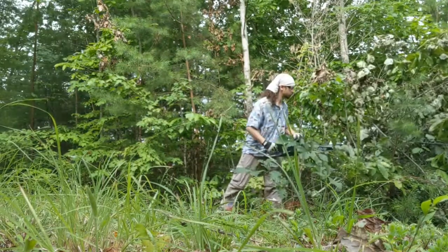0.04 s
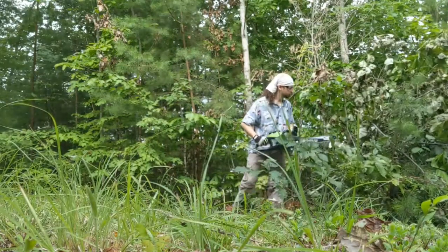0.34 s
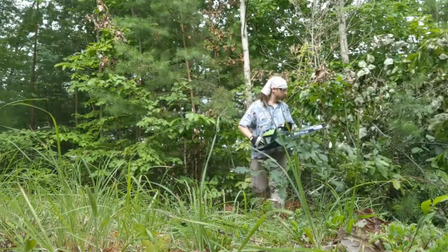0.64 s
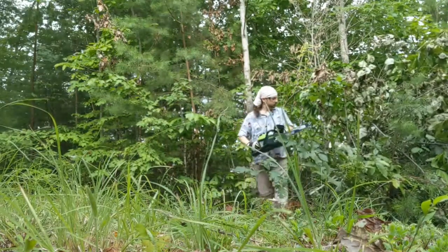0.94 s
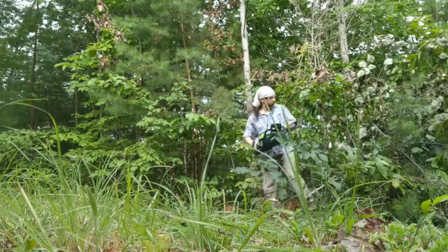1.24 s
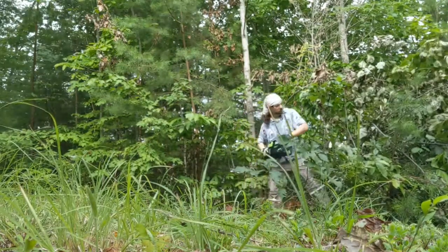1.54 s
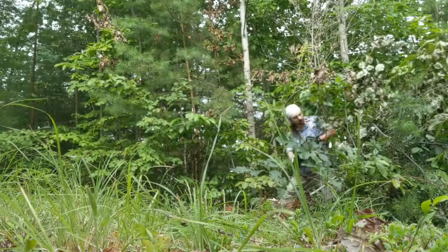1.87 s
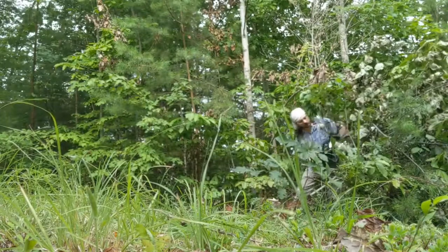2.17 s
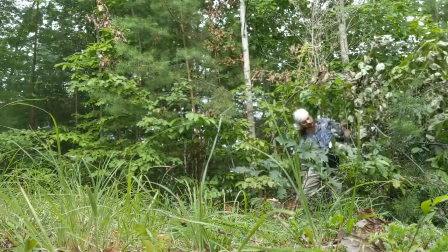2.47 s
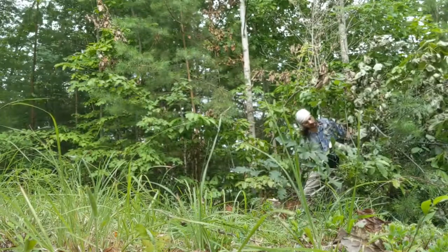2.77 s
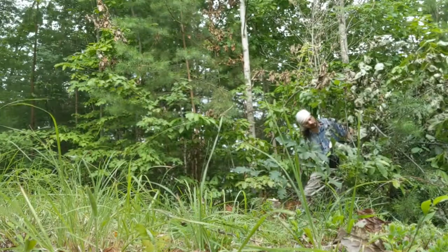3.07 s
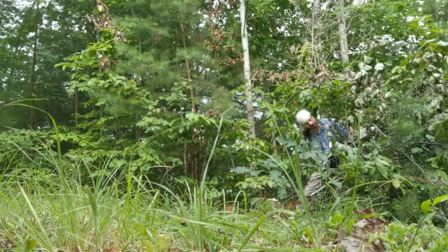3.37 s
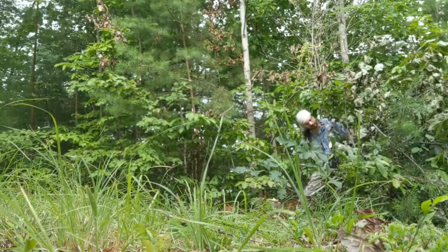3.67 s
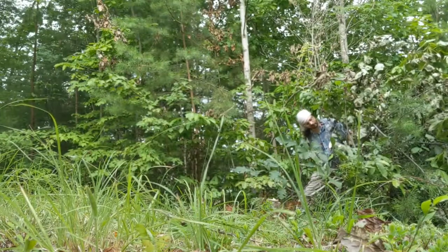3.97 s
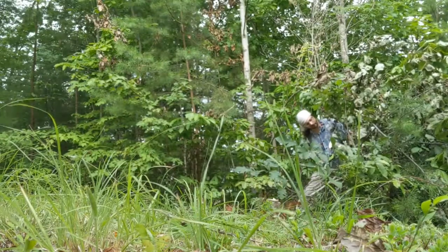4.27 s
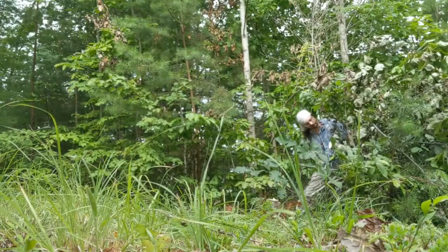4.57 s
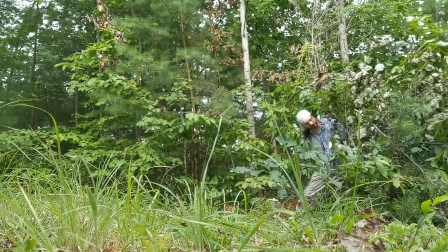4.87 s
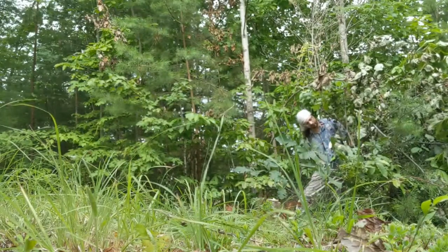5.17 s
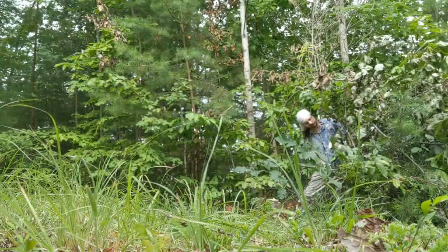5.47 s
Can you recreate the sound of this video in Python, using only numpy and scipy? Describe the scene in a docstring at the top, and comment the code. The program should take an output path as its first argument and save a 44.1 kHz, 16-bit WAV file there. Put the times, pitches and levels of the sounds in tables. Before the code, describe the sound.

A cordless electric chainsaw is already running at full speed, a high, even whine over a fine metallic clatter of the chain. At about 0.6 seconds it starts coasting down, the pitch sinking and the chain rattling more loosely, and by about 1.2 seconds it is braked to a stop. From 1.5 to 2.7 seconds leaves rustle softly as brush is pushed aside, with a few dull bumps on stems. A twig cracks faintly near 2 seconds, two snap sharply around 2.2 and another at 2.6. The saw then spins up in a smooth, slightly raspy rise, reaching speed at about 3.6 seconds. It runs on a little lower than before, wavering and sagging slightly, until the end near 5.7 seconds. Faint forest air lies underneath, the trees scatter back a short tail, and the right side sounds quieter and duller than the left.

```python
"""A cordless chainsaw whines at full speed at the edge of a wood, coasts down and is braked to a stop. Brush
rustles, twigs snap and stems bump; the trigger clicks and the saw spins up again and runs on a little slower.
The whine is the chain meshing with its six-tooth sprocket; the links clatter along the bar and drum the
housing. Trees scatter a short tail over faint forest air. The right microphone is shaded and dull."""
import sys
import numpy as np
from scipy import signal
from scipy.fft import rfft, irfft, next_fast_len
from scipy.io import wavfile
from scipy.ndimage import uniform_filter1d, map_coordinates

SR = 44100
rng = np.random.default_rng(int(sys.argv[2]) if len(sys.argv) > 2 else 0)


def store_pcm(level_fs):
    """Save levels as 16-bit WAV."""
    pcm = np.round(np.clip(level_fs, -1, 1) * 32767).astype(np.int16)
    wavfile.write(sys.argv[1], SR, np.atleast_2d(pcm).T)


N = 252247
TIME_S = np.arange(N) / SR

TEETH = 6
RELEASE_S, BRAKE_S, RESTART_S = 0.55, 1.072, 2.637


# Meshing overtones: (sprocket order [rounded in use], level [dB], growth with speed [dB/octave])
MESH_OVERTONES = [(12, -36.5, 4), (17.97, -43, -0.5), (24.16, -55.5, -2.5)]
# Weaker drive lines: (sprocket order, level [dB], gain on a loose chain [dB])
DRIVE_LINES = [(2, -21, 1), (3, -24, -2.5), (4, -24, -4.5), (5, -27, -6), (7, -31, 6), (8, -24, 7.5),
               (9, -20.5, 1.5), (10, -26.5, 10.5), (11, -30, 10.5), (13, -29.5, 12.5), (17, -23, 6.5)]
# Saw swung about: (time [s], meshing tone gain [dB], left minus right [dB])
SAW_SWING = [(0, 4.5, -4.5), (.17, 2.5, -2.5), (.45, -1.5, -0.5), (.6, -3, -3), (.69, 4.5, .5),
             (.8, 1.5, 1.5), (1.05, 4, -0.5), (3.2, 1.5, 2.5), (3.58, 0, 3.5), (3.68, -8.5, -2),
             (4.0, -10.5, 0), (4.14, -4, 1), (5, -5, 1), (5.45, -8.5, 3), (5.72, -6.5, 4)]
def whine(turns, mesh_hz, drive_db, flutter_db=1.03, slack_rad=0.028, left_lead_rad=0.56):
    """Links mesh with the sprocket: one tone, its overtones and weaker lines, all gliding with speed."""
    swing_db, side_db = curves(SAW_SWING)
    cover_db = 6.5 * np.exp(-((mesh_hz - 871.6) / 47.5) ** 2)  # sprocket cover resonance
    tone_db = -24.5 + speed_db(mesh_hz, db_per_octave=18.5) + cover_db + swing_db
    sag = 1 + np.clip((930 - mesh_hz) / 200, 0, 1.2)  # a slow chain runs less evenly
    angle = 2 * np.pi * turns + slack_rad * sag * wobble(45)
    stereo_rad = np.array([[left_lead_rad], [0]])
    lines = []
    for order, db, growth in MESH_OVERTONES:
        low_cut_db = 20 * np.log10(1 + (450 * TEETH / (order * mesh_hz)) ** 4)  # weak below 450 Hz
        lines.append((round(order), db + speed_db(mesh_hz, growth) - low_cut_db))
    for order, db, loose_db in DRIVE_LINES:
        lines.append((order, drive_db + db + loose_db * looseness()))
    sound = amp(tone_db + flutter_db * sag * wobble(50)) * np.sin(TEETH * angle + stereo_rad)
    for order, db in lines:
        jitter_rad = (0.14 + 0.012 * order) * sag ** 1.8 * wobble(110)
        line_db = db + housing_db(order, mesh_hz) + flare_db(order) - 2.5 + 2 * sag * wobble(40)
        phase = order * angle + jitter_rad + rng.uniform(0, 2 * np.pi)
        sound += amp(line_db) * np.sin(phase + stereo_rad)
    return amp(8 + np.array([side_db, -side_db]) / 2) * sound


# Housing radiation: (frequency [Hz], gain [dB])
HOUSING_RESPONSE = [(100, -37), (300, -14.5), (550, -7), (850, 3.5), (1150, -8.5), (1500, -9),
                    (2200, -12.5), (2700, -7.5), (3000, 12.5), (3400, 9.5), (5000, -30.5)]
def housing_db(order, mesh_hz):
    """Gain of one sprocket order as it glides through the housing's resonances."""
    return along(HOUSING_RESPONSE, order * mesh_hz / TEETH)


# Flares of single lines: (time [s], half length [s], sprocket order, gain [dB])
LINE_FLARES = [(0.02, .06, 12, 15), (.25, 0.31, 8, 5.5), (.28, 0.079, 12, 12), (.41, 0.082, 18, 4.5),
               (0.635, .06, 18, 11), (.85, 0.14, 12, 5.5), (.9, .05, 24, 12.5), (3.176, 0.036, 12, 8),
               (3.72, 0.055, 18, 4.5), (4.17, 0.14, 18, 3.5), (4.2, 0.27, 24, 18.5),
               (4.52, 0.054, 24, 12.5), (5, 0.74, 18, 4.5), (5.1, 0.76, 24, 12.5)]
def flare_db(order):
    """One line swells briefly as the chain tightens."""
    return sum(db * np.exp(-((TIME_S - at_s) / half_s) ** 2)
               for at_s, half_s, flaring, db in LINE_FLARES if flaring == order)


# Held speed, running free: (time [s], link rate [Hz])
FREE_SPEED = [(0.04, 1005), (0.56, 1014)]
# Held speed among the stems: (time [s], link rate [Hz])
WORK_SPEED = [(3.68, 962.9), (3.91, 966), (4.13, 946.2), (4.4, 943.3), (4.47, 931), (4.89, 926.5),
              (5.02, 916), (5.45, 929), (5.6, 918), (5.7, 923)]
def chain_speed(coast_hz_per_s=940, brake_hz_per_s=5400, spin_up_hz_per_s=964,
                torque_fade_s=0.068, creep_hz=95.06, inertia_s=0.06):
    """Link rate in Hz: held, coasting down, braked to rest, then ramped up by the soft start."""
    free_hz, = curves(FREE_SPEED)
    work_hz, = curves(WORK_SPEED)
    released_s = np.clip(TIME_S - RELEASE_S, 0, BRAKE_S - RELEASE_S)
    pulling_s = torque_fade_s * (1 - np.exp(-released_s / torque_fade_s))
    coasting_hz = free_hz - coast_hz_per_s * (released_s - pulling_s)
    braking_hz = coasting_hz - brake_hz_per_s * np.maximum(TIME_S - BRAKE_S, 0)
    stopping_hz = creep_hz * np.logaddexp(0, braking_hz / creep_hz)  # the brake loses grip near rest
    starting_hz = np.minimum(spin_up_hz_per_s * (TIME_S - RESTART_S), work_hz)
    mesh_hz = np.maximum(np.maximum(stopping_hz, starting_hz), 1)
    return uniform_filter1d(mesh_hz, int(inertia_s * SR))


def speed_db(mesh_hz, db_per_octave, full_hz=1000, rest_hz=39.8):
    """Level relative to full speed, falling to silence at rest."""
    return db_per_octave * np.log2(mesh_hz / full_hz) - 20 * np.log10(1 + (rest_hz / mesh_hz) ** 2)


def looseness(onset_s=0.25, free_share=0.37):
    """Chain slack, 0 to 1: slight running free, full once the motor stops pulling, none under load."""
    released = (1 + np.tanh((TIME_S - RELEASE_S) / onset_s)) / 2
    return (TIME_S < RESTART_S) * (free_share + (1 - free_share) * released)


# Broad resonances of links and bar: (frequency [Hz], width [Hz], gain [dB])
STEEL_MODES = [(3220, 1570, -2.5), (4000, 2600, -6.5), (5750, 910, 2.5), (7660, 2180, 3), (9700, 1780, 3),
               (11790, 1650, 1), (13600, 5800, -1)]
# Thin ringing of the steel links: (frequency [Hz], width [Hz], gain [dB])
LINK_RING_MODES = [(6085, 28, 11), (6580, 35, 2)]
def clatter(turns, drive_db, throb_db=-0.5, shake_db=0.5, low_cut_hz=2700):
    """Links tick against the bar, a little harder once a turn; being small, they radiate no bass."""
    force = amp(throb_db * np.sin(2 * np.pi * turns) + shake_db * wobble(90))
    blows = force * ticks(32000, spread_db=1)
    steel = lambda hz: resonances(STEEL_MODES + LINK_RING_MODES, hz) * (1 - 1 / (1 + (hz / low_cut_hz) ** 6))
    return amp(drive_db + 6.5) * unit(filtered(blows, steel))


def guide_bar(mesh_hz, centre_hz=3060, width_hz=430, surge_db=1.5, loose_db=8):
    """The flapping chain makes the bar sing in a hoarse band, loudest while it runs loose."""
    level_db = -31.5 + speed_db(mesh_hz, db_per_octave=5.5) + loose_db * looseness()
    band = resonant_noise([(centre_hz, width_hz, 0)], (2, N))
    return amp(level_db + surge_db * wobble(50)) * band


# Chain knock through the housing: (frequency [Hz], relative density [dB])
KNOCK_SPECTRUM = [(20, -52), (105, -26), (170, -31), (270, -16.5), (390, -20.5), (520, -12.5), (700, -12.5),
                  (850, 3), (1020, -7.5), (1350, -12), (1750, -19), (2400, -15), (5000, -26)]
def knocking(drive_db, growth=0.74, lumpy_db=2, loose_db=-3):
    """The chain slaps in its groove and drums the housing, even at low speed."""
    moving = 1 / (1 + amp(-70.5 - drive_db) ** 2)
    level_db = growth * drive_db - 13.5 + loose_db * looseness() + lumpy_db * wobble(70)
    return moving * amp(level_db) * stereo_noise(KNOCK_SPECTRUM)


def rasp(mesh_hz, centre_hz=900, width_hz=650, lumpy_db=2.5, loose_db=4.5, glide_hz=780):
    """The chain grinds in its groove while starting and braking; at speed it glides."""
    grinding = 1 / (1 + (mesh_hz / glide_hz) ** 10)
    level_db = -37 + speed_db(mesh_hz, db_per_octave=6.5) + loose_db * looseness()
    band = resonant_noise([(centre_hz, width_hz, 0)], N)
    return grinding * amp(level_db + lumpy_db * wobble(110)) * band


# Leaf rustle: (frequency [Hz], relative density [dB])
LEAF_SPECTRUM = [(120, -29), (200, 1), (223, -12), (430, -3.5), (564, -5.5), (812, -13.5), (890, -8.5),
                 (1030, -14), (1950, -16), (3300, -0.5), (5010, -4.5), (7480, 0.5), (15500, -7.5)]
# Foliage pushed aside: (time [s], relative level [dB])
LEAF_SWISHES = [(1.53, -57.5), (1.8, -55.5), (2.12, -47), (2.2, -45), (2.25, -47.5), (2.4, -49),
                (2.65, -50)]
def brush(rise_s=0.063, fall_s=0.074, clump_db=1.1):
    """Leaves scrape past in clumps of small crackles; each swish swells out of a faint stir and fades."""
    swishes = [amp(db) * np.exp(-np.maximum((at_s - TIME_S) / rise_s, (TIME_S - at_s) / fall_s))
               for at_s, db in LEAF_SWISHES]
    stir = amp(-63.5)
    level = amp(7.5) * np.sqrt(stir ** 2 + np.sum(np.square(swishes), axis=0))
    crackle = ticks(14000, spread_db=0.5) * amp(clump_db * wobble(51))
    return level * unit(filtered(crackle, lambda hz: amp(along(LEAF_SPECTRUM, hz))))


# Twigs breaking, then the saw's trigger click at 2.61 s: (time [s], relative level [dB], treble tilt
# [dB/octave])
SNAPS = [(1.965, -39, -4.5), (2.218, -24.5, 9), (2.251, -23, 7), (2.61, -26, 7.5)]
def snaps(tail_t60_s=0.21, crack_t60_s=0.017, crack_db=3):
    """Each snap or click is a sharp crack with a short tail."""
    sound = np.zeros((2, N))
    for at_s, db, tilt in SNAPS:
        colour = lambda hz: amp(along(LEAF_SPECTRUM, hz) + tilt * np.log2(1 + hz / 500))
        noise = unit(filtered(rng.standard_normal((2, N)), colour))
        age_s = np.abs(TIME_S - at_s)
        crack = amp(crack_db - 60 * age_s / crack_t60_s)
        tail = amp(-60 * age_s / tail_t60_s)
        sound += (TIME_S >= at_s) * amp(db - 10) * (crack + tail) * noise
    return sound


# Bumps of stems and feet: (time [s], relative level [dB])
STEM_BUMPS = [(2.06, -48.5), (2.105, -40), (2.24, -53), (2.376, -41), (2.592, -47), (2.635, -37.5)]
# Green wood resonances: (frequency [Hz], width [Hz], gain [dB])
STEM_MODES = [(460, 350, -7), (940, 340, 6)]
def bumps(t60_s=0.088, attack_s=0.0036):
    """Soft knocks on green wood, without ring."""
    envelope = np.zeros(N)
    for at_s, db in STEM_BUMPS:
        age_s = np.maximum(TIME_S - at_s, 0)
        envelope += amp(db - 8 - 60 * age_s / t60_s) * (1 - np.exp(-age_s / attack_s))
    return envelope * resonant_noise(STEM_MODES, N)


def lingering(level_db, scatter_db=-12, t60_s=0.27):
    """A level in dB with the brief tail added that the nearest foliage scatters."""
    decay = amp(-120 / (t60_s * SR))
    power = amp(level_db) ** 2
    tail = signal.lfilter([1 - decay], [1, -decay], power)
    return 10 * np.log10(power + amp(scatter_db) ** 2 * tail)


# Decay among the trees: (frequency [Hz], t60 [s])
WOODS_DECAY = [(200, .45), (1000, 0.47), (5000, 0.67), (15000, 0.48)]
def woods(x, delay_samples=400):
    """Trunks and foliage scatter back a short diffuse tail."""
    hz, age_s, noise = signal.stft(rng.standard_normal((2, SR // 2)), SR, nperseg=256)
    decay = amp(-60 * age_s / along(WOODS_DECAY, hz)[:, None])
    _, tail = signal.istft(noise * decay, SR, nperseg=256)
    delayed = np.pad(x, ((0, 0), (delay_samples, 0)))
    return signal.fftconvolve(delayed, tail / np.linalg.norm(tail[0]), axes=1)[:, :N]


# Forest air: (frequency [Hz], relative density [dB])
AIR_SPECTRUM = [(12, -31.5), (20, 2.5), (44, -5.5), (175, -9), (232, -14), (932, -20), (1580, -32),
                (3450, -18), (4950, -28), (5690, -9), (6540, -32.5), (9930, -22), (15500, -36)]
def forest_air(level_db=-53):
    """Still air: a faint rumble with a thin hiss."""
    return amp(level_db) * stereo_noise(AIR_SPECTRUM)


# Likeness of left and right: (frequency [Hz], correlation [0..1])
STEREO_CORRELATION = [(60, 1), (300, 0.35), (800, 0.66), (1500, 0), (3000, 0)]
def stereo_noise(spectrum):
    """Noise of rms 1, alike on both sides in the bass, independent in the treble."""
    def mid_side_gains(hz):
        angle = np.arccos(along(STEREO_CORRELATION, hz)) / 2
        return amp(along(spectrum, hz)) * [np.cos(angle), np.sin(angle)]
    mid, side = filtered(rng.standard_normal((2, N)), mid_side_gains)
    return unit(np.array([mid + side, mid - side]))


def resonant_noise(modes, shape):
    """Noise through resonances, at rms 1."""
    return unit(filtered(rng.standard_normal(shape), lambda hz: resonances(modes, hz)))


def resonances(modes, hz):
    """Gain of steep-sided resonances whose powers add."""
    power = sum(amp(db) ** 2 * np.abs(hz * width / (centre ** 2 - hz ** 2 + 1j * hz * width)) ** 4
                for centre, width, db in modes)
    return np.sqrt(power)


def ticks(per_s, spread_db):
    """Tiny random impacts of uneven size, in stereo at rms 1."""
    hits = rng.random(N) < per_s / SR
    sizes = amp(spread_db * rng.standard_normal(N))
    return unit(hits * sizes * rng.standard_normal((2, N)))


def wobble(knots_per_s):
    """A smooth random curve."""
    knots = rng.standard_normal(int(N * knots_per_s / SR) + 4)
    return map_coordinates(knots, [TIME_S * knots_per_s])


def filtered(x, response):
    """x through a gain given as a function of frequency."""
    size = next_fast_len(N + SR // 2)
    return irfft(rfft(x, size) * response(np.fft.rfftfreq(size, 1 / SR)), size)[..., :N]


def along(points, hz):
    """(frequency [Hz], value) points interpolated on a log axis."""
    knots_hz, values = np.transpose(points)
    return np.interp(np.log(hz + 1), np.log(knots_hz + 1), values)


def curves(rows):
    """One value per sample for each column after the time."""
    knots_s, *columns = np.transpose(rows)
    return [np.interp(TIME_S, knots_s, column) for column in columns]


def amp(db):
    """Decibels to gain."""
    return 10 ** (np.asarray(db) / 20)


def unit(x):
    """x at rms 1."""
    return x / np.sqrt(np.mean(x ** 2) + 1e-20)


def scene():
    """Saw and brush among the trees, over still forest air."""
    mesh_hz = chain_speed()
    turns = np.cumsum(mesh_hz) / SR / TEETH
    # a fast or loose chain strikes harder
    drive_db = -20.5 + speed_db(mesh_hz, db_per_octave=7) + 2.03 * looseness()
    lingering_db = lingering(drive_db)
    saw = whine(turns, mesh_hz, drive_db) + clatter(turns, lingering_db)
    saw += guide_bar(mesh_hz) + knocking(lingering_db) + rasp(mesh_hz)
    near = saw + brush() + snaps() + bumps()
    return near + amp(-18) * woods(near) + forest_air()


# Right microphone relative to left: (frequency [Hz], gain [dB])
RIGHT_SHADE = [(60, 0), (200, -4), (700, -4.5), (1300, -8.5), (2000, -3.5), (3000, -14.5), (4300, -1.5),
               (5700, -13.5), (9500, -15.5), (11000, -23.5), (15000, -16.5)]
def record(dry, ceiling=0.85, top_hz=15780):
    """The shaded right microphone hears less treble; peaks are rounded and the band is limited."""
    heard = filtered(dry, lambda hz: np.array([np.ones_like(hz), amp(along(RIGHT_SHADE, hz))]))
    rounded = heard / (1 + np.abs(heard / ceiling) ** 8) ** (1 / 8)
    return filtered(rounded, lambda hz: hz < top_hz)


dry = scene()
out = record(dry)
store_pcm(out)
```